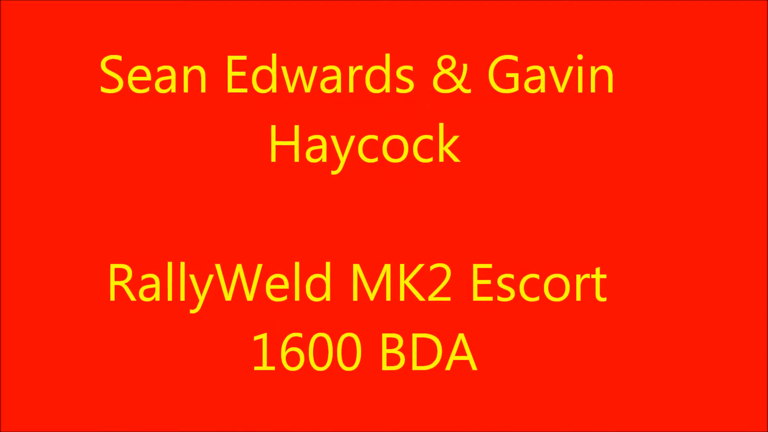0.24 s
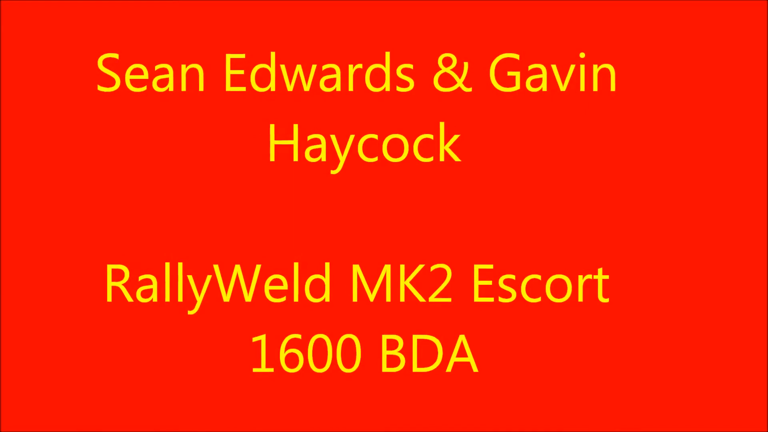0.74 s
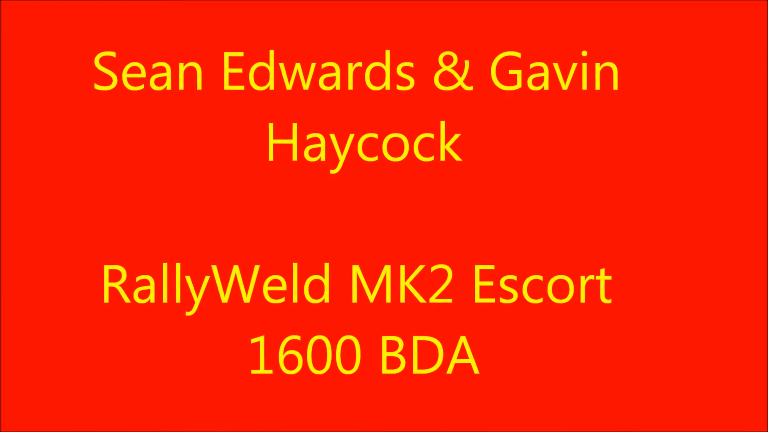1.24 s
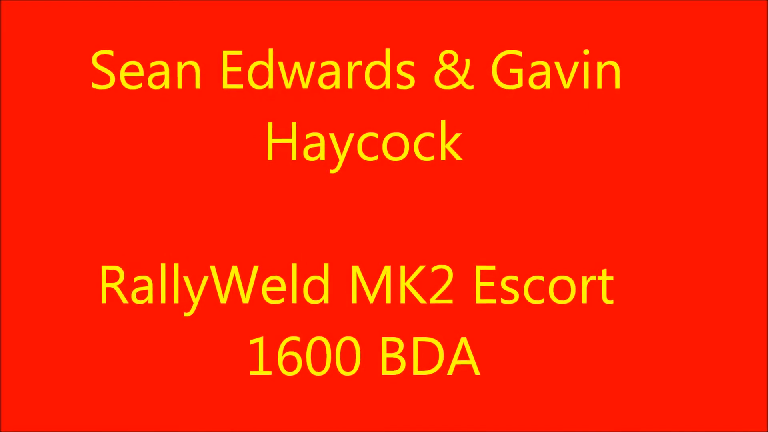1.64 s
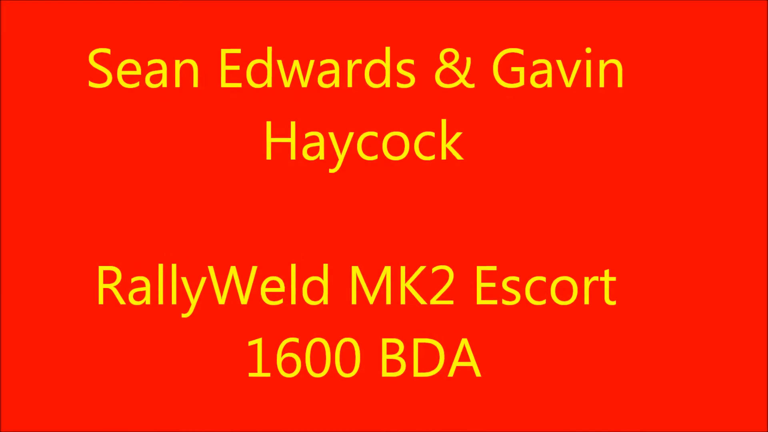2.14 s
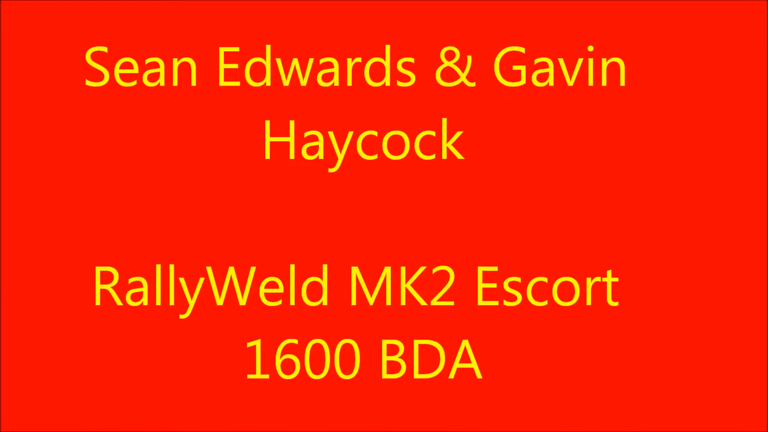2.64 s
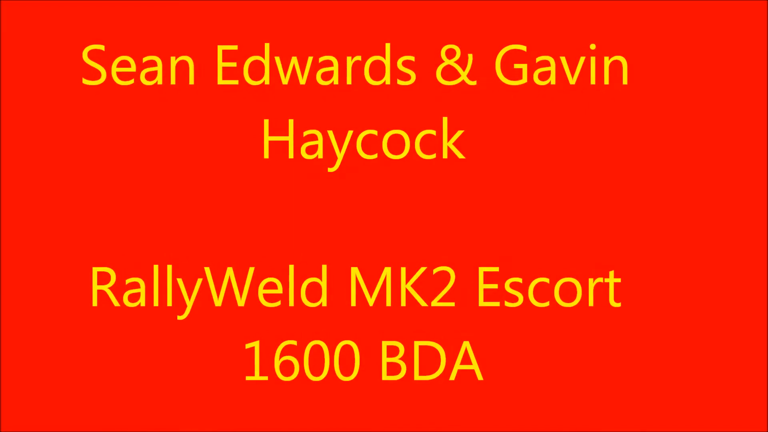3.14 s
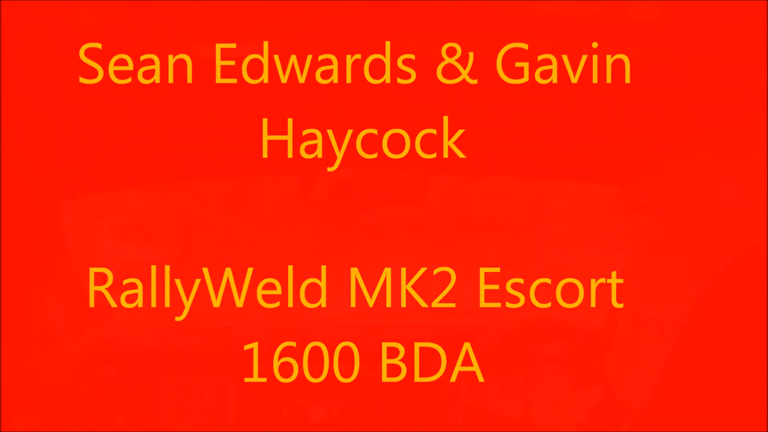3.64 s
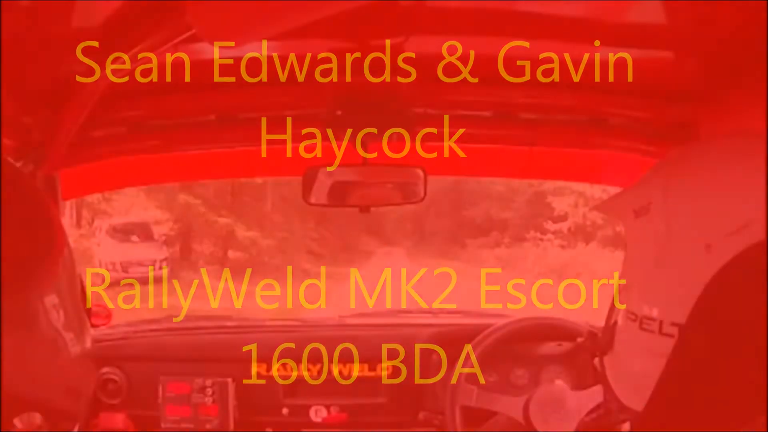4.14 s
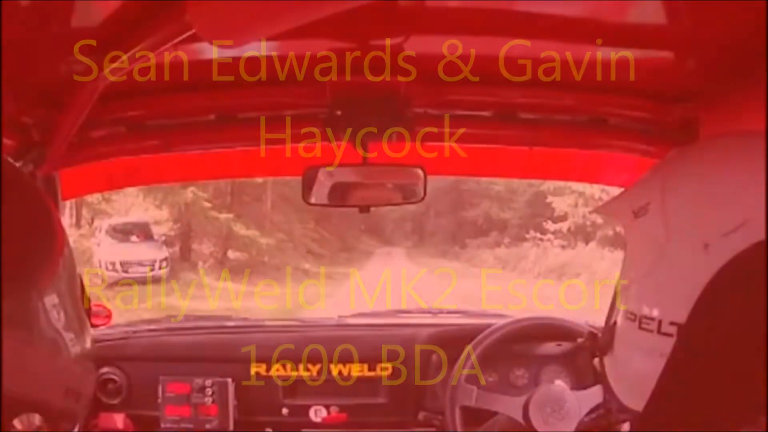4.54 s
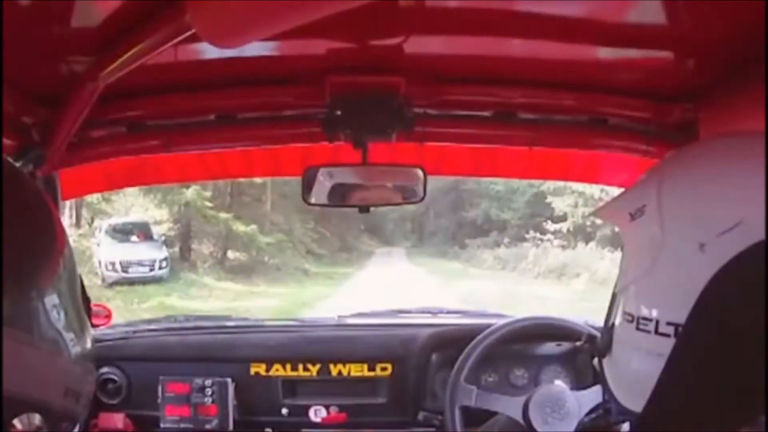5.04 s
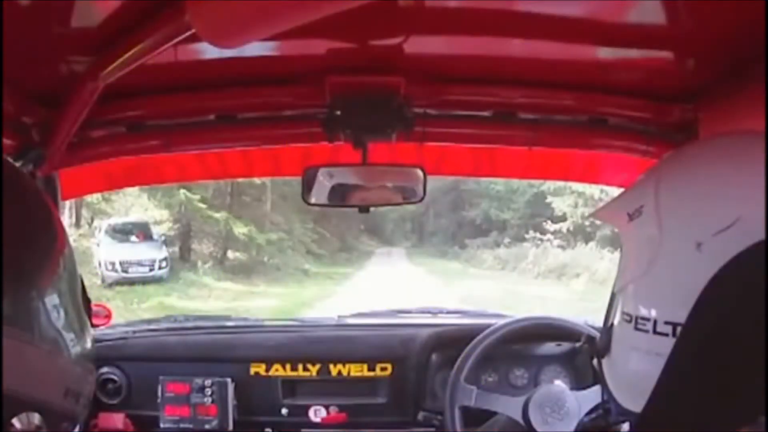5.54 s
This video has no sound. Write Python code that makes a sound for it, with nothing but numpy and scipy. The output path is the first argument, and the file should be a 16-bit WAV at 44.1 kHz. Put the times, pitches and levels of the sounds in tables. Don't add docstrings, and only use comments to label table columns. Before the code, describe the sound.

Inside a stripped rally car, a loud four-cylinder engine climbs steadily for about four seconds, its pitch dipping as tyres bite, with gear whine, hiss and shell rumble. It stutters on the rev limiter, then crossfades to the same engine standing still, deeper and quieter. Trim rattles briefly as two throttle blips rise and fall. Close, dry small camera microphone, with thin, patchy treble.

```python
import sys
import numpy as np
from scipy import signal
from scipy.fft import rfft, irfft, next_fast_len
from scipy.io import wavfile
from scipy.ndimage import uniform_filter1d

SR = 44100
rng = np.random.default_rng(int(sys.argv[2]) if len(sys.argv) > 2 else 0)


def to_wav(sig):
    pcm = np.clip(np.atleast_2d(sig), -1, 1) * 32767
    pcm = np.round(pcm).astype(np.int16)
    wavfile.write(sys.argv[1], SR, pcm.T)


def volts_from_decibels(level):
    exponent = np.asarray(level, float) / 20
    return 10 ** exponent


N = 256220

PULL_END_S, PULL_FADE_S = 4.69, 0.019
BLIP_START_S, BLIP_FADE_S = 3.75, 0.6


def in_time(rows):
    s, *columns = np.transpose(rows)
    return [np.interp(np.arange(N) / SR, s, c) for c in columns]


def fade(at_s, length_s):
    return np.clip((np.arange(N) / SR - at_s) / length_s, 0, 1)


def bumps(s, length):
    return np.exp(-((np.arange(N)[:, None] / SR - s) / length) ** 2)


def swell(events):
    s, length, size = np.transpose(events)
    return bumps(s, length) @ size


def rms_one(x):
    return x / np.sqrt(np.mean(x ** 2) + 1e-20)


def drift(rate, step=1):
    r = np.exp(-80 * np.pi * rate / SR)
    noise = rng.standard_normal(N // 40 + 2002)
    slow = signal.lfilter([1], [1, -2 * r, r * r], noise)[2000:]
    return np.interp(np.arange(0, N, step) / 40, np.arange(len(slow)), rms_one(slow - slow.mean()))


def resonance(hz, centre_hz, width):
    return 1 / (1 + (2 * (hz - centre_hz) / width) ** 2)


def levels(parts, cycle_hz, load_db):
    octaves = np.log2(cycle_hz / 48)
    return {name: db + per_load * load_db + per_octave * octaves
            for name, (db, per_load, per_octave) in parts.items()}


def exhaust(cycle_hz, pipe):
    power = np.full((3, N), 1e-9)
    for multiple, hz, width, db in pipe:
        power[int(multiple) - 1] += volts_from_decibels(db) ** 2 * resonance(4 * multiple * cycle_hz, hz, width) ** 2
    return 10 * np.log10(power)


def engine(cycle_hz, firing_db, uneven_db, orders_db, cabin, branches, wander_db, blur, speed):
    step = 8
    turn = 2 * np.pi * np.cumsum(cycle_hz) / SR
    out = 0
    for k, order_db in orders_db:
        order_hz = k * cycle_hz[::step]
        if k in (4, 8, 12):
            level = volts_from_decibels(firing_db[k // 4 - 1][::step] + order_db)
        else:
            ringing = sum(volts_from_decibels(db[k % 4]) ** 2 * resonance(order_hz, hz, width) ** 2
                          for hz, width, *db in cabin)
            rasp_db = 1.5 * (k > 12)
            level = volts_from_decibels(uneven_db[::step] + order_db + rasp_db) * np.sqrt(ringing)
        wobble = blur * k * drift(speed, step) + rng.uniform(0, 2 * np.pi)
        branch_db = sum(db * resonance(order_hz, hz, width) ** 2
                        for order, hz, width, db in branches if order == k)
        level = level * volts_from_decibels(branch_db + wander_db * min(k / 12, 1.3) * drift(speed, step))
        out = out + level * np.sqrt(2) * np.sin(k * turn[::step] + wobble)
    return signal.resample_poly(out, step, 1)[:N], turn


# time in seconds, length in seconds,
# loss of engine speed in cycles per second, drop of the firing note in dB, drop of the uneven orders in dB.
LIMITER = [
    (4.102, 0.045, 1.54, -8, 11),
    (4.195, 0.022, 0.12, 10, 9),
    (4.415, 0.055, 0, 26, 3),
]


def limiter():
    s, length, *drops = np.transpose(LIMITER)
    return (bumps(s, length) @ np.transpose(drops)).T


# time in seconds, engine cycles per second.
SPEED = [(0, 29.1), (1.62, 44.6), (1.91, 48.6), (2.54, 55.3), (2.8, 59.4), (2.91, 59.2), (3.27, 63.6),
         (3.36, 65.8), (3.64, 68.6), (3.95, 70), (4.03, 69.2), (4.27, 70.1), (4.41, 67.4), (4.61, 68.8),
         (4.7, 67.4)]
# time in seconds, loss of speed in cycles per second.
BITES = [
    (.41, 0.8),
    (.65, 0.95),
    (0.929, 0.77),
    (1.27, 0.78),
    (1.51, 0.7),
    (1.759, 0.86),
    (2.011, 1.515),
    (2.242, 1.58),
    (2.64, 0.95),
    (3.51, 1.1),
]
# time in seconds,
# load in dB.
LOAD = [(0, 2), (.3, -0.5), (.6, 1), (1.25, -1), (1.5, 2), (2.2, 0.5), (2.65, 1.5), (3.4, -2), (3.8, -.5),
        (4.02, 3.5), (4.13, -1.5), (4.4, -5.5), (4.63, -5), (4.7, -5.5)]
# order, level in dB.
PULL_ORDERS_DB = [(1, -21), (2, -1.5), (3, -3.3), (4, 0.5), (5, 3.5), (6, 0.5), (7, -2.1), (8, 0.5), (9, 0),
                  (10, -2), (11, 1.5), (12, -3.5), (13, -1.5), (14, 5.5), (15, 2), (16, 4), (17, 1),
                  (18, -3.4), (19, -2.5), (20, -3), (21, 3.5), (22, 0), (23, -2), (24, -5), (25, 5.5),
                  (26, -4), (27, -7), (28, -2.5), (29, -1.5), (30, -6.5), (31, -4.5), (32, 5.5)]
# pitch in Hz, width in Hz, then four levels in dB, for orders that leave
PULL_CABIN = [(173, 200, -25, -10, -27, -4.5), (267, 49.2, -30, 8.5, 4, 16.5),
              (330, 16, -30, 3, -7.5, -0.5), (419, 160, -2, -4.5, -20.5, -5.5),
              (499, 45, 7.5, -32, -24.5, -9.5), (542, 39, 1.5, 6, -10, -2), (625, 197, -8.5, -6, -4, 1.5),
              (775, 100, -20, -10, -8.5, -10.5), (881, 68, -4.5, -27, -18, -24),
              (984, 39, -13, -6, -15, -8.5), (1064, 40, -12, -7.5, 2.5, -9.5),
              (1107, 150, -15.5, -8.5, -14, -7.5), (1250, 76, -27.5, -6.5, -16, -18.5),
              (1390, 240, -14, -13.5, -29.5, -8.5), (2080, 200, -21.5, -23.5, -26, -26)]
# order, pitch in Hz, width in Hz, lift in dB.
PULL_BRANCHES = [(1, 62, 15, -8), (2, 125, 30, -6), (5, 150, 30, -4), (5, 174, 10, 6), (5, 192, 22, -6),
                 (6, 180, 15, -5), (6, 232, 20, -8), (7, 215, 25, -7), (7, 285, 30, 2), (7, 337, 14, 5),
                 (7, 354, 14, -5), (7, 380, 20, 5), (7, 460, 30, 5), (9, 347, 22, 9), (9, 402, 25, -8),
                 (9, 490, 35, -8), (9, 590, 40, 5), (10, 445, 20, 6), (10, 570, 40, -6), (10, 655, 40, 4),
                 (12, 418, 25, 9), (12, 486, 25, 6), (12, 840, 14, 3), (13, 452, 25, 6), (13, 675, 50, 7),
                 (13, 765, 30, 7), (14, 470, 25, -6), (14, 580, 40, -5), (14, 650, 30, -4),
                 (15, 522, 25, 5), (15, 1040, 40, -5), (16, 470, 30, 7), (16, 512, 18, -2),
                 (17, 520, 45, 9), (20, 604, 30, 6), (16, 648, 30, 7), (17, 645, 50, -8), (17, 755, 80, 6),
                 (18, 545, 25, 6), (18, 695, 30, 5), (18, 1060, 40, -4), (19, 661, 30, -7),
                 (19, 890, 40, 8), (20, 772, 30, 6), (20, 894, 40, -8), (20, 1140, 100, 6),
                 (21, 811, 40, -8), (21, 1250, 60, 5), (22, 1058, 40, -5)]
# firing multiple, pitch in Hz, width in Hz, level in dB.
PULL_EXHAUST = [(1, 112, 19, -27.5), (1, 134.3, 21, -29), (1, 165, 25, -29), (1, 199.8, 48, -24.5),
                (1, 255.4, 32.5, -26.5), (1, 281, 6.8, -23.5), (2, 254.5, 40, -28.5), (2, 305, 23, -31.5),
                (2, 340, 78, -34), (2, 489, 42, -31.5), (2, 552, 38, -34.5), (3, 362, 40, -32),
                (3, 480, 20, -43.5), (3, 537, 40, -27.5), (3, 653, 76, -26.5), (3, 735, 67, -35.5),
                (3, 835, 30, -42.5)]
# level in dB at mean speed, dB per dB of load, dB per octave of speed.
PULL_PARTS = dict(firing=(0, .3, 0), uneven=(-38.5, 0.32, 2.1), rumble=(-54.5, .3, -19),
              roar=(-37, .6, -3.5), hiss=(-29, 0.98, 0), top=(-44, 1, 10.7))
# time in seconds, length in seconds, lift in dB.
SNAPS = [
    (.15, 0.1, 1.5),
    (4.52, 0.1, 2),
    (5.12, 0.055, 2),
]


def pull_through_gear():
    (cycle_hz,), (load_db,) = in_time(SPEED), in_time(LOAD)
    bite_s, bite_hz = np.transpose(BITES)
    sag_hz, firing_drop_db, uneven_drop_db = limiter()
    cycle_hz = cycle_hz - sag_hz - bumps(bite_s, .065) @ bite_hz
    on_limiter_s = 4.05
    on_limiter = fade(on_limiter_s, .05)
    part_db = levels(PULL_PARTS, cycle_hz, load_db)
    firing_db = exhaust(cycle_hz, PULL_EXHAUST) + part_db["firing"]
    firing_db[0] -= firing_drop_db
    firing_db[2] += 10 * on_limiter
    uneven_db = part_db["uneven"] + swell(SNAPS[:1]) - uneven_drop_db - 3 * on_limiter
    sunk_db = 36 * fade(4.45, 1)
    part_db["roar"] -= sunk_db + 2.5 * fade(on_limiter_s, .1)
    notes, turn = engine(cycle_hz, firing_db, uneven_db, PULL_ORDERS_DB, PULL_CABIN, PULL_BRANCHES,
                         wander_db=1.4, blur=.007, speed=5)
    return volts_from_decibels(0.36 - sunk_db) * notes + whine(cycle_hz, turn), turn, part_db


# time in seconds, engine cycles per second, load in dB, exhaust note in dB.
BLIPS = [(3.85, 34.63, 4, -1.5), (4.05, 33.5, 3, -2), (4.33, 29, 2, 0), (4.44, 33.91, 1.5, -2.5),
         (4.5, 38.29, -4, 0), (4.55, 42.2, 6, -4.5), (4.71, 50.3, 2, -7.5), (4.84, 46.5, -4, -6.5),
         (5.03, 41.74, -2.5, -1), (5.13, 47.65, 2, 3), (5.29, 63.75, 1.5, 0), (5.35, 65.45, 2.5, -8.5),
         (5.5, 58.63, -4, 0.5), (5.67, 52.66, -5.5, 2), (5.76, 49.43, -7.5, -1), (5.81, 47.9, -13, 1)]
BLIP_ORDERS_DB = list(enumerate([-9, -5.5, 0.5, 2, -2, -11, -14, 2, -5.5, -6, -10, 3, -4, -1.5, -5, -6, -13.5, -10.5, -12.5, -8.5],
                  1))
# pitch in Hz, width in Hz, then four levels in dB, for orders
BLIP_CABIN = [(60, 57, -7.5, 1, -8.5, -3.5), (250, 40, 3, 4, -2.5, -1.5), (390, 43, -4, -6, 7, 2.5),
              (472, 41, 7, 0, -7, -0.5), (610, 40, 11, -4.5, -6, -1), (711, 46, 0, 0.5, 5.5, 3.5),
              (1300, 200, -17, -19, -20.5, -18.5)]
# order, pitch in Hz, width in Hz, lift in dB.
BLIP_BRANCHES = [(1, 53, 7, 10), (1, 64, 8, -6), (2, 115, 30, -5), (3, 160, 30, 9), (5, 250, 30, 3),
                 (6, 335, 60, 9), (7, 325, 40, 8), (9, 500, 80, 5), (10, 590, 60, -7), (11, 560, 150, 7),
                 (13, 590, 25, -10), (13, 640, 50, 4), (12, 715, 40, -3), (14, 690, 40, 2),
                 (16, 610, 40, -10)]
# firing multiple, pitch in Hz, width in Hz, level in dB.
BLIP_EXHAUST = [(1, 140, 30, -37.5), (1, 170.4, 11, -31), (1, 211, 26.6, -31.5), (1, 252.3, 25, -25),
                (2, 295, 29, -29), (2, 372.4, 38, -35), (2, 405, 30, -34), (2, 470.6, 50, -31),
                (3, 415, 15, -41), (3, 370, 65, -42), (3, 698, 39, -35)]
# level in dB at mean speed, dB per dB of load, dB per octave of speed.
BLIP_PARTS = dict(uneven=(-38, .1, .1), rumble=(-53.5, .1, 5.0), roar=(-49, 0.12, 11.5), hiss=(-42, 1, 0),
              top=(-51.5, 1, -9))


def blip_at_standstill():
    cycle_hz, load_db, note_db = in_time(BLIPS)
    part_db = levels(BLIP_PARTS, cycle_hz, load_db)
    firing_db = exhaust(cycle_hz, BLIP_EXHAUST) + note_db
    gaining = uniform_filter1d(np.gradient(cycle_hz) * SR, size=2000)
    firing_db[2] -= .09 * np.maximum(gaining, 0)
    firing_db[1] -= 25 * (1 - fade(4.42, .04))
    uneven_db = part_db["uneven"] + 0.57 * note_db + swell(SNAPS[1:])
    notes, turn = engine(cycle_hz, firing_db, uneven_db, BLIP_ORDERS_DB, BLIP_CABIN, BLIP_BRANCHES,
                         wander_db=3.2, blur=.036, speed=12)
    return notes, turn, part_db


# order, pitch in Hz of the panel that sounds it, width in Hz, level in dB,
# roughness in radians.
WHINE = [(34, 2130, 280, -41, .5), (40, 1600, 250, -48, .7), (49, 1850, 340, -45.5, .7),
         (73.5, 2600, 650, -42, 1), (73.5, 3350, 500, -41, 1.3), (84.3, 3570, 200, -35, .9),
         (92, 3550, 800, -45, 2), (94.5, 3650, 800, -39, 1.1), (96, 3450, 1000, -34.5, .9),
         (97.6, 3500, 700, -39, 1.1), (101.5, 3420, 200, -37, 1.1)]
# time in seconds, length in seconds, lift in dB.
MESHING = [
    (.46, .05, -9),
    (.58, .07, 4),
    (1.0, .04, -4),
    (1.13, .04, -4),
    (.75, .05, 3),
    (1.35, .05, -6),
    (1.45, .06, 2),
]


def whine(cycle_hz, turn):
    out = 0
    for order, hz, width, db, rough in WHINE:
        level = volts_from_decibels(db + 3.2 * drift(20)) * resonance(order * cycle_hz, hz, width) ** 2
        shake = 1.25 * rough * drift(15) + .5 * rough * np.sin(turn)
        out = out + level * np.sqrt(2) * np.sin(order * turn + shake)
    return volts_from_decibels(1.0 + swell(MESHING)) * out


# time in seconds, peak level in dB.
CHATTER = [
    (4.674, -21),
    (4.69, -24),
    (4.701, -29),
    (4.716, -24),
    (4.745, -28),
    (4.785, -24),
    (4.796, -33),
    (4.88, -36),
    (4.925, -31),
    (4.97, -45),
]
# pitch in Hz, level in dB, seconds to die away by 60 dB.
TRIM = [
    (3400, -15, .003),
    (5250, -8, .0045),
    (5900, -7, .0016),
    (7000, -11, .0015),
]


def chatter():
    n = np.arange(70)
    luck = rng.standard_normal((len(n), 6))
    s = 4.6737 + .00382 * n + 5.5e-6 * n ** 2 + .00012 * luck[:, 0]
    level_db = np.interp(s, *np.transpose(CHATTER)) + 1.8 * luck[:, 1]
    out = np.zeros(N)
    for k, (hz, db, t60) in enumerate(TRIM):
        clicks = np.full(N, 1e-18)
        clicks[(s * SR).astype(int)] = volts_from_decibels(level_db + db + 2.5 * luck[:, 2 + k])
        r, w = volts_from_decibels(-60 / (t60 * SR)), 2 * np.pi * hz / SR
        out += signal.lfilter([0, np.sin(w)], [1, -2 * r * np.cos(w), r * r], clicks)
    return out


def coloured(points, patchy_db=0, count=1):
    size, table = next_fast_len(N), np.array(points)
    hz = np.fft.rfftfreq(size, 1 / SR)
    level_db = np.interp(np.log(hz + 1), np.log(table[:, 0]), table[:, 1], left=-90, right=-90)
    cells = rfft(rng.standard_normal(size)) * volts_from_decibels(level_db)
    panel = np.digitize(hz, np.geomspace(table[1, 0], table[-3, 0], count + 1)[1:-1])
    out = 0
    for k in range(count):
        out = out + volts_from_decibels(patchy_db * drift(7)) * irfft(cells * (panel == k), size)[:N]
    return rms_one(out)


def throb(turn, per_cycle, per_firing):
    return rms_one(1 + per_cycle * np.cos(turn) + per_firing * np.cos(4 * turn))


# pitch in Hz, level in dB per Hz.
RUMBLE = [(12, -23), (20, -3.5), (48, -9.5), (64, 1.5), (81, -14.5), (110, 0), (140, -37), (240, -120)]
ROAR = [(53, -58), (90, -16), (145, -8), (221, -8.5), (259, -2), (379, -17), (549, -6.5), (746, -11.5),
        (897, -12.5), (1070, -8), (1700, -17), (2210, -39), (3740, -120)]
BLIP_ROAR = [(53, -45.5), (90, -12.5), (181, -5), (297, -5), (370, -4), (613, -6.5), (701, -10.5),
             (803, -12), (1000, -21.5), (1360, -17.5), (1700, -28.5), (2210, -58), (3740, -120)]
HISS = [(940, -38), (1600, -13), (2420, -4.5), (2840, -8.5), (3330, -3), (3510, -0.5), (4270, -9.5),
        (4600, -17.5), (5980, -24.5), (10100, -120)]
BLIP_HISS = [(940, -45), (1600, -6), (1710, -11), (1900, -10), (2250, -2), (2980, -2), (3750, 3),
             (4600, -6), (5980, -32.5), (10100, -120)]
TOP = [(3800, -30), (4500, 0), (5200, -3.5), (6000, -5), (6800, -4), (7400, -7), (8200, -12), (8500, -60)]
# time in seconds, length in seconds, level in dB.
THUDS = [(.74, .04, -36), (1.493, .04, -40), (1.75, .12, -47), (2.01, .1, -46), (2.42, .07, -45),
         (3.43, .09, -50), (4.03, .06, -48), (4.272, 0.067, -40), (4.726, 0.044, -37),
         (5.002, 0.071, -33.5), (5.387, 0.081, -37), (5.7, 0.11, -36)]
# time in seconds, length in seconds, drop in dB.
SMOOTH = [
    (.15, .05, 5),
    (2.279, .05, 10),
    (2.762, .13, 21),
    (3.222, 0.082, 20),
    (3.64, .06, 18),
    (3.88, 0.057, 7),
]


def noises(pull_turn, blip_turn, blend, pull_db, blip_db):
    rumble_db, roar_db, hiss_db = ((1 - blend) * pull_db[part] + blend * blip_db[part]
                                   for part in ("rumble", "roar", "hiss"))
    late = fade(PULL_END_S, 0.03)
    top_db = (1 - late) * pull_db["top"] + late * blip_db["top"]

    s, length, thud_db = np.transpose(THUDS)
    shell = volts_from_decibels(rumble_db + 4.1 * drift(3.6) - swell(SMOOTH)) + bumps(s, length) @ volts_from_decibels(thud_db - 4.0)
    rumble = shell * coloured(RUMBLE, patchy_db=3.0, count=2)

    roar = (1 - blend) * volts_from_decibels(2.0) * throb(pull_turn, .18, 0) * coloured(ROAR)
    roar = roar + blend * volts_from_decibels(13.0) * coloured(BLIP_ROAR)
    roar = volts_from_decibels(roar_db + 0.39 * drift(8.8)) * roar

    gate = (1 - blend) * throb(pull_turn, .14, .14) + blend * throb(blip_turn, .15, .2)
    hiss = (1 - blend) * coloured(HISS, patchy_db=1.2, count=6) + blend * coloured(BLIP_HISS)
    hiss = volts_from_decibels(hiss_db - 2.1 + 0.3 * drift(5.4)) * hiss
    hiss = hiss + volts_from_decibels(top_db + 3.0 + 0.77 * drift(10)) * coloured(TOP)
    return rumble + roar + gate * hiss


def scene():
    pull, pull_turn, pull_db = pull_through_gear()
    blips, blip_turn, blip_db = blip_at_standstill()
    ended = fade(PULL_END_S, PULL_FADE_S)
    mix = pull * (1 - ended) + blips * fade(BLIP_START_S, BLIP_FADE_S)
    mix = mix + noises(pull_turn, blip_turn, ended, pull_db, blip_db)
    return (mix + chatter())[None]


# time in seconds, pitch in Hz below which all is kept,
# pitch in Hz above which all is dropped.
STARVED = [(0, 4700, 6750), (2.3, 5040, 7370), (2.501, 5130, 6730), (3.6, 6510, 7562), (4.65, 6580, 6993),
           (4.672, 7650, 8200), (4.97, 6160, 8380), (5.2, 7060, 7600), (5.23, 6500, 6550),
           (5.5, 5900, 6810), (5.81, 5450, 6780)]
# time in seconds, length in seconds, rise of the bar in dB.
LEAN = [
    (.7, .7, .8),
    (.43, .07, 3),
    (.63, .03, 2.5),
    (1.26, .06, 2),
    (2.75, .2, 1),
]


def thin_treble(x, low_db=-6.0, high_db=5.0, spared_db=2.5):
    hz, s, cells = signal.stft(x, SR, window="cosine", nperseg=2048, noverlap=1024)
    power = uniform_filter1d(abs(cells) ** 2, size=5, axis=0)
    usual = uniform_filter1d(uniform_filter1d(power, size=40, axis=0), size=3, axis=1)
    at_s, kept, dropped = np.transpose(STARVED)
    kept_hz, dropped_hz = np.interp(s, at_s, kept), np.interp(s, at_s, dropped)
    climb = (hz[:, None] - kept_hz) / (dropped_hz - kept_hz)
    bar_db = low_db + (high_db - low_db) * np.sqrt(np.clip(climb, 0, 9))
    bar_db = bar_db - spared_db * resonance(climb, .8, .3)
    lean_db = sum(db * np.exp(-((s - at) / length) ** 2) for at, length, db in LEAN)
    bar_db = bar_db + lean_db * np.clip(2 * climb, 0, 1)
    alive = ((power > usual * volts_from_decibels(bar_db) ** 2) | (climb < 0)) & (climb < 1.1)
    return signal.istft(cells * alive, SR, window="cosine", nperseg=2048, noverlap=1024)[1][:N]


def band_limit(x):
    return signal.sosfilt(signal.butter(12, 15600, fs=SR, output="sos"), x)


def record(dry):
    x = thin_treble(dry[0])
    x[int(.4563 * SR)] += volts_from_decibels(-30)
    return band_limit(x[None])


dry = scene()
out = record(dry)
to_wav(out)
```